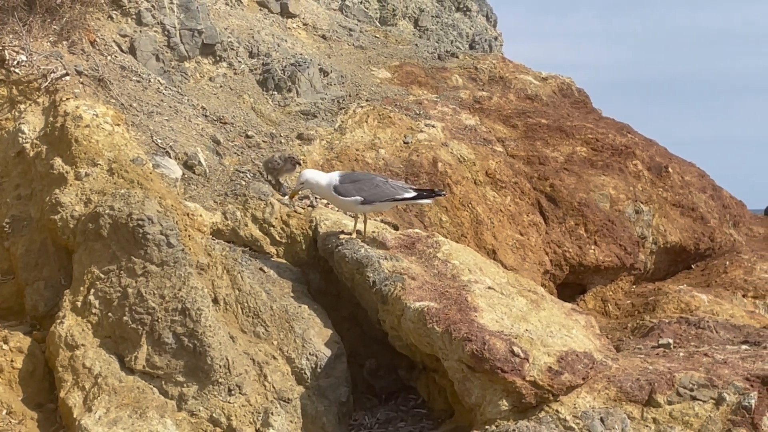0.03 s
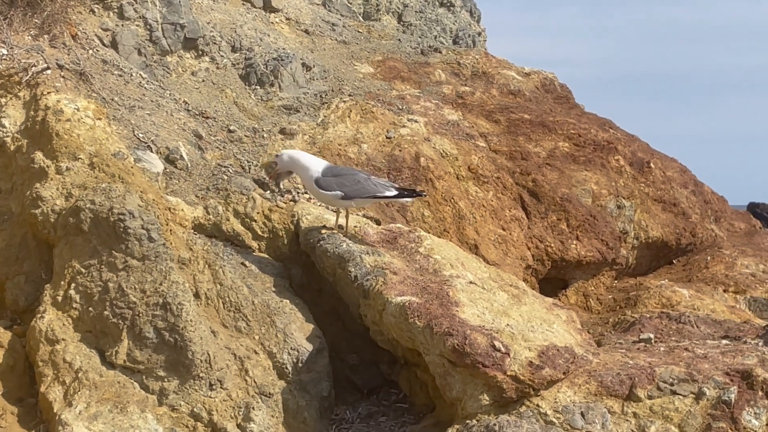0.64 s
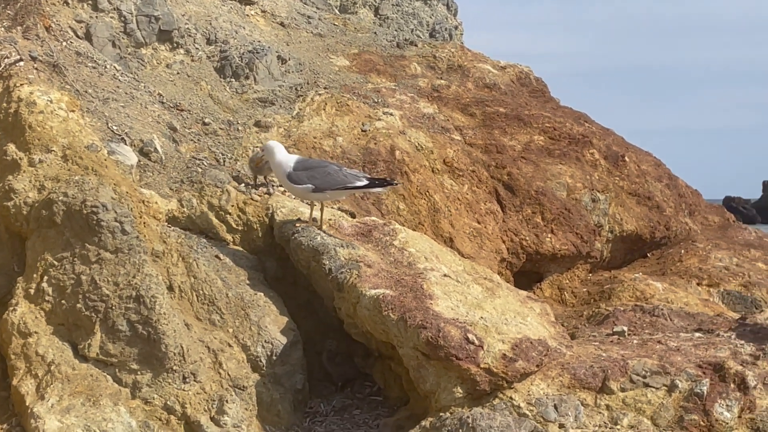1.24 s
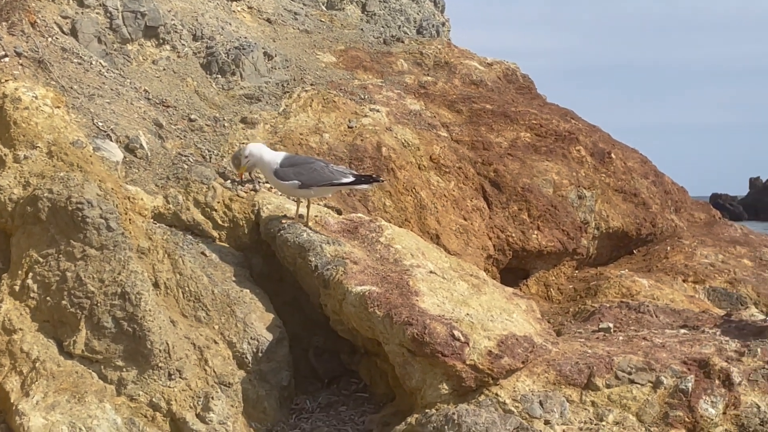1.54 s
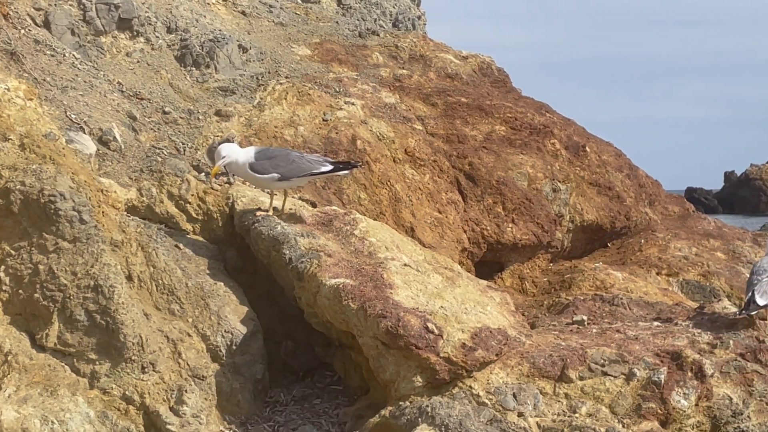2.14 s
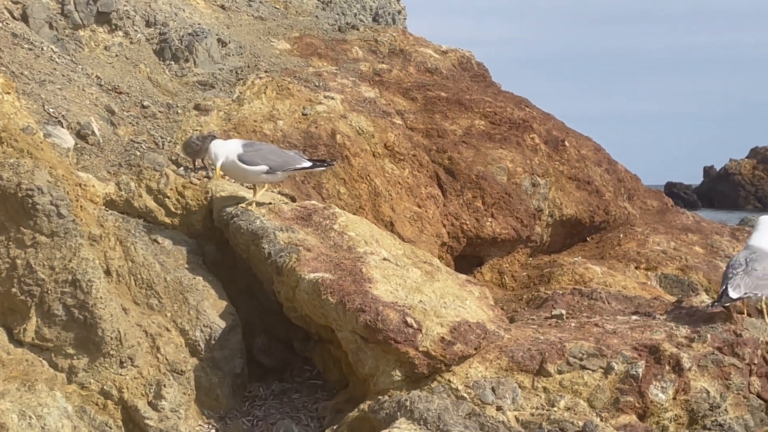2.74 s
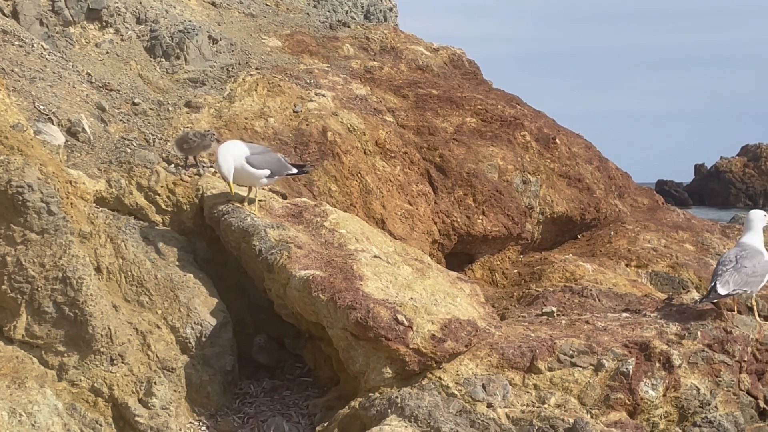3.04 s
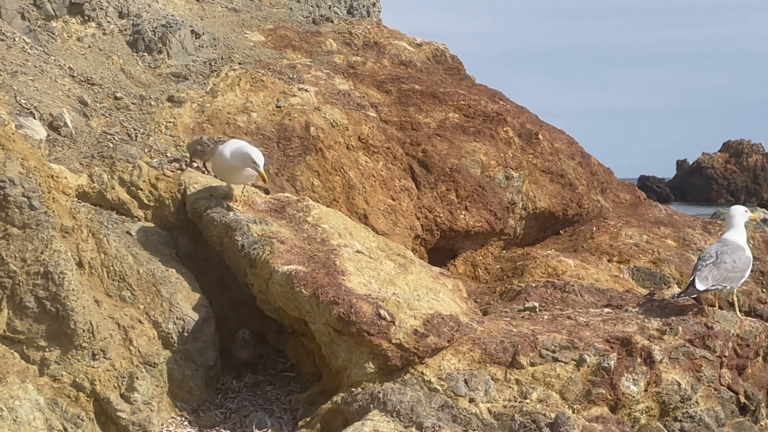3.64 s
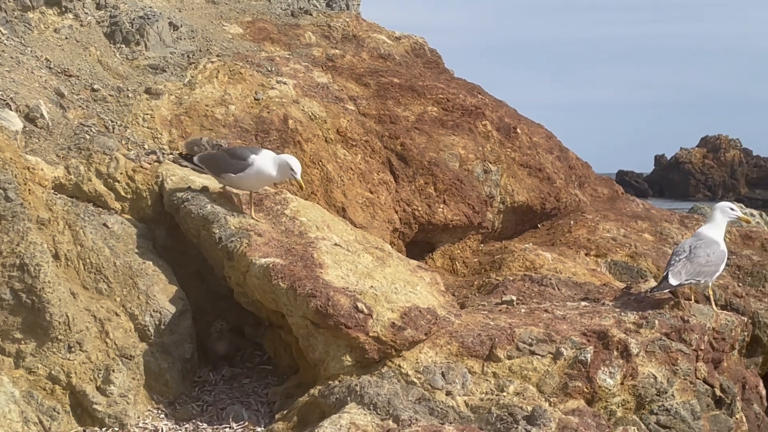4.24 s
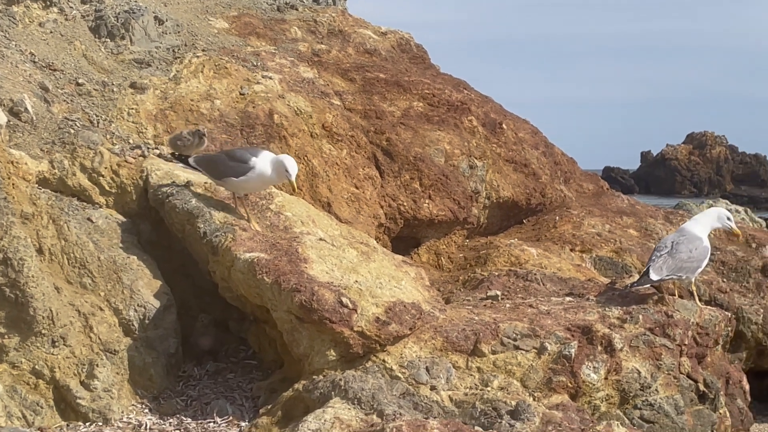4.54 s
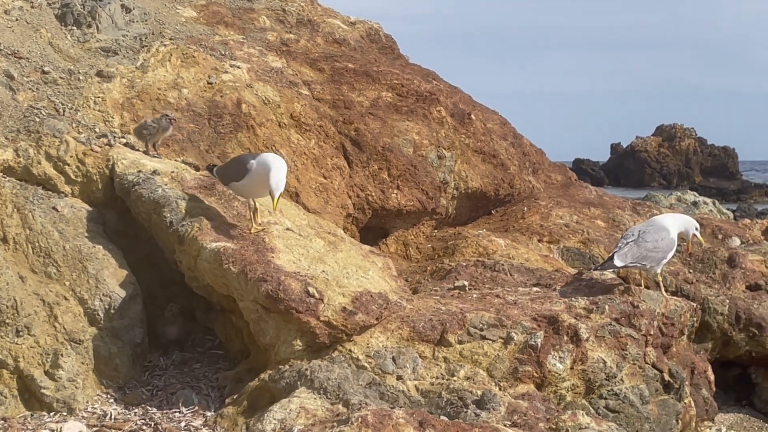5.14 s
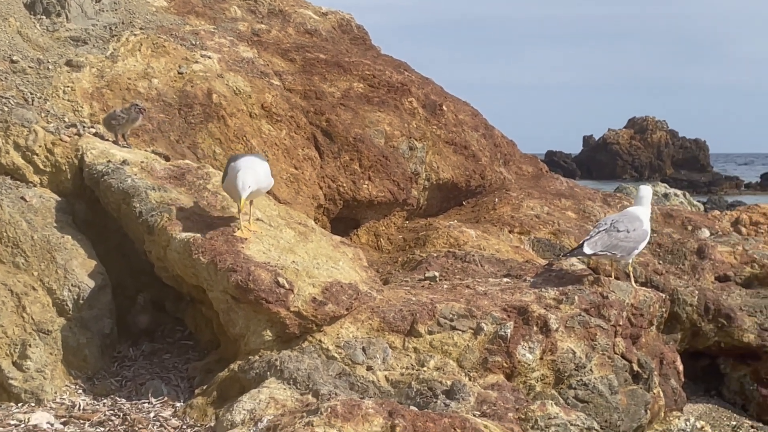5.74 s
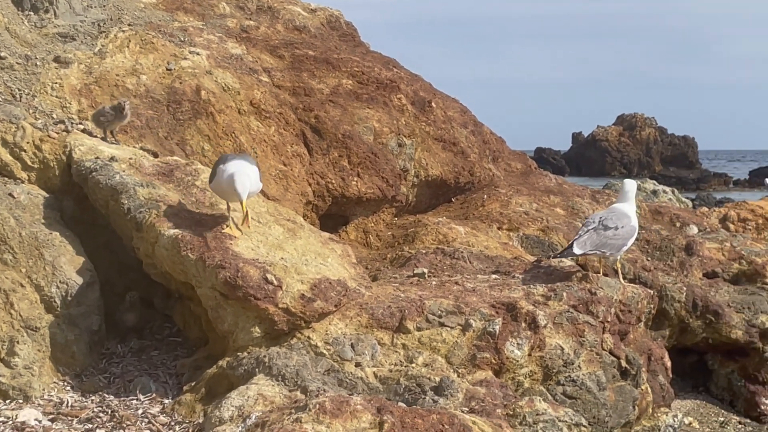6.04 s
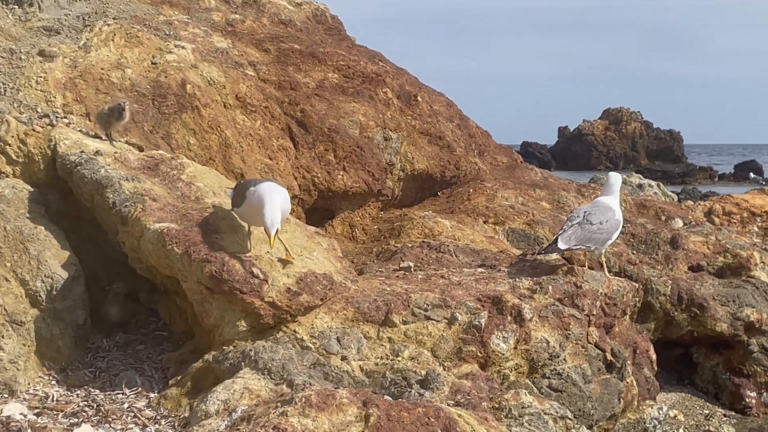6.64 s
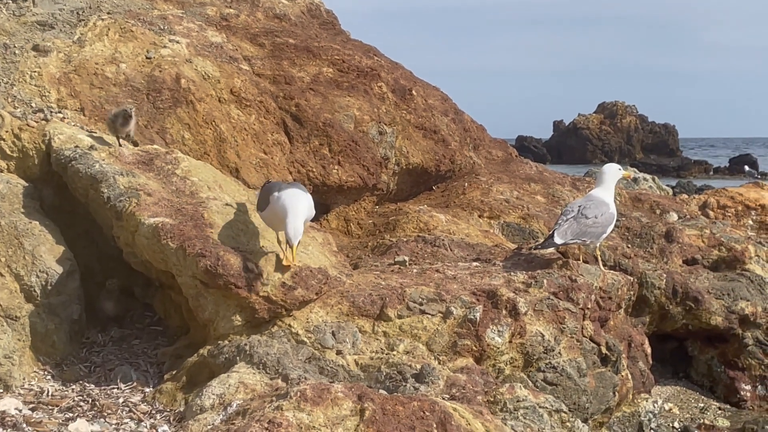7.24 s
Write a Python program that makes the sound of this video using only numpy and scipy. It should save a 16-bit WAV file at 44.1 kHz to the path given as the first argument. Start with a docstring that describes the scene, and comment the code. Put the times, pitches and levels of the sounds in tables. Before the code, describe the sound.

Distant sea washes low and steady behind a rocky shore. A chick begs in a faint, hoarse quaver at 0.3 seconds, returning around 1.8, 3.3, 4.9 and 6.6. A gull mews at 0.6, with a small dry knock. The wind rises and thumps on the microphone from 1 to 1.6 seconds, the loudest moment. Faint, thin chick peeps come in threes near 1, 3.4 and 5.6 seconds. A second mew sounds at 2.4 and a louder, yelping one at 3.1. Gusts rumble from about 4 seconds, with two small knocks on rock near 4.4 and more buffets around 5.5 and 6.2. A long, more distant wail runs from 4.6 to 5.6, overlapped by another gull's mew at 5.1. A nasal wail lasts from 6.5 to 7.4, followed by one peep. The cliff gives every call a slight, short echo.

```python
"""A rocky shore, the sea washing behind. A chick starts begging in hoarse quavers, then a gull mews:
a harmonic tone shaped by its throat and moving beak. The chick adds thin peeps as the wind picks up
and sheds eddies that thump on the microphone. Two more mews follow, then gusts and small knocks on
the rock. A long wail is overlapped by a second gull's mew, and a nasal wail and one peep close the
scene. The chick keeps returning throughout, and the cliff briefly answers every call."""
import sys
import numpy as np
from scipy import signal
from scipy.fft import rfft, irfft, next_fast_len
from scipy.io import wavfile
from scipy.ndimage import uniform_filter1d, map_coordinates

SR = 44100
rng = np.random.default_rng(int(sys.argv[2]) if len(sys.argv) > 2 else 0)


def waveform_to_disk(signal):
    """Save audio, clipped to [-1, 1], as 16-bit WAV at the path in sys.argv[1]."""
    frames = np.transpose(np.atleast_2d(signal))
    scaled = np.clip(frames, -1, 1) * 32767
    samples = np.round(scaled).astype(np.int16)
    wavfile.write(sys.argv[1], SR, samples)


N = 330309
T = np.arange(N) / SR
TOP_HZ = 14200

# tone colour of the noise beds: f/Hz, relative level/dB
SEA_SPECTRUM = [(25, -23), (70, 1.5), (170, -16), (1000, -18.5), (1600, -29), (6500, -51), (10000, -58.5)]
RUMBLE_SPECTRUM = [(22, -17), (65, 1), (130, -6), (300, -20), (600, -24.5), (1200, -37.5), (6000, -79)]
# stereo width of the beds: f/Hz, left-right correlation
BED_CORRELATION = [(60, .985), (250, .7), (1000, .45), (5000, .85), (11000, .3)]
# the breeze, freshening over the first second: t/s, level/dB
BREEZE = [(0, -78), (.8, -53.5), (1.7, -52.5)]
# gusts on top of it: crest t/s, level/dB, decay t/s
GUSTS = [(3.29, -48.5, 0.78), (4.15, -39, 0.24), (4.47, -41, 0.75), (5.482, -36, 0.2), (6.19, -38, 0.1)]
# large eddies striking the microphone: t/s, level/dB, starting f/Hz
EDDIES = [(1.03, -32.5, 664), (1.086, -19, 375), (1.246, -32.5, 333), (1.301, -22, 413),
          (1.309, -19.5, 266), (1.431, -11.5, 454), (1.435, -16.5, 160), (1.451, -18.5, 464),
          (1.548, -17.5, 548), (1.769, -34.5, 504), (2.17, -41, 635), (2.61, -42, 330), (2.991, -36.5, 587),
          (3.285, -39, 330), (4.033, -33.5, 500), (4.146, -28.5, 644), (4.159, -26.5, 337),
          (4.186, -38, 616), (4.243, -35, 604), (4.324, -35.5, 720), (4.437, -37.5, 420), (4.486, -39, 600),
          (4.581, -34.5, 655), (4.685, -39.5, 380), (5.437, -28.5, 570), (5.83, -35, 300),
          (6.113, -35.5, 490), (6.171, -21, 112.4), (6.314, -34, 583), (6.411, -34, 624),
          (7.46, -34.5, 390)]
# decay of the cliff's answer: f/Hz, t60/s
CLIFF_DECAY = [(300, 0.1), (1000, 0.5), (6000, 0.2)]
# small knocks on the rock: t/s, level/dB, ring f/Hz
KNOCKS = [(.669, -32.5, 1904), (4.392, -39, 850), (4.467, -36.5, 980)]

# the chick's peeps: t/s, pitch f/Hz, level/dB, glide as a share of the pitch
PEEPS = [(1.003, 676, -56, 0.11), (1.075, 681, -60, -0.069), (1.157, 633, -65.5, -0.077),
         (3.348, 696, -55.5, 0.059), (3.427, 680, -52.5, -0.17), (3.521, 675, -56, -0.067),
         (5.579, 661, -56.5, -0.13), (5.653, 685, -51.5, -0.17), (5.729, 637, -62.5, -0.085),
         (7.45, 710, -51.5, -0.04)]
# its hoarse quavers: start t/s, end t/s, pitch f/Hz, level/dB
BEGS = [(0.339, 0.577, 889, -55), (1.81, 2.104, 907, -57.5), (3.307, 3.593, 916, -59),
        (4.9, 5.188, 890, -53), (6.592, 6.835, 921, -54.5)]
# its throat for each: f/Hz, relative level/dB
PEEP_THROAT = [(1400, -15), (2100, -4), (2800, -1), (3050, -2.5), (3400, 2.5), (3800, -9), (4750, -6.5),
               (5500, -31), (7200, -21), (14000, -63.5)]
BEG_THROAT = [(500, -41), (920, 6), (1350, -33), (1850, -1), (2600, 6.5), (3500, -8.5), (4500, -7),
              (5600, -26), (7500, -41), (10500, -26), (14000, -48)]

# held part of each gull call, with harmonics 1-4 as its body and the higher ones as its edge:
# t/s, pitch f/Hz, body level/dB, edge level/dB, beak resonance f/Hz
MEW_1 = [(.59, 423.5, -38, -53, 1187), (.615, 441, -42, -51, 1110), (.67, 432, -41.5, -59.5, 1120),
         (.75, 405.6, -46, -62, 943), (.825, 425.5, -35.5, -68.5, 972), (.858, 386, -47, -73.5, 900)]
MEW_2 = [(2.385, 365.3, -49.5, -50, 916), (2.455, 431.5, -46.5, -52.5, 1124), (2.53, 432.5, -48, -46, 1154),
         (2.585, 421.3, -53.5, -62.5, 975), (2.648, 403.4, -40, -69.5, 777),
         (2.672, 395, -49.5, -75.5, 790)]
MEW_3 = [(3.058, 394.5, -44.5, -54, 1300), (3.078, 407, -34, -40, 1380), (3.117, 414.2, -37.5, -48, 1440),
         (3.124, 434, -39, -44.5, 990), (3.142, 451.3, -34.5, -59, 860), (3.218, 443.6, -31, -58.5, 850),
         (3.243, 434.6, -34.5, -67, 910)]
MEW_4 = [(5.083, 426.4, -38, -48.5, 1310), (5.1, 424.3, -32.5, -43, 1240),
         (5.122, 449.5, -42.5, -59.5, 1020), (5.18, 427.3, -40, -64.5, 970),
         (5.23, 404.2, -45.5, -65.5, 940), (5.38, 388.5, -42.5, -62.5, 1016),
         (5.475, 386.6, -45, -61.5, 895)]
WAIL_1 = [(4.648, 349.2, -49.5, -64, 1330), (4.74, 360.6, -60.5, -64.5, 1190),
          (4.84, 370.7, -49.5, -59.5, 1440), (5.04, 396.4, -50.5, -62.5, 1550),
          (5.17, 419.6, -46.5, -54, 1810), (5.32, 406.4, -42.5, -58, 1380), (5.46, 383, -53, -78, 1520),
          (5.485, 443, -45, -60, 1190), (5.585, 418.3, -47, -66.5, 1000)]
WAIL_2 = [(6.545, 412, -44.5, -57.5, 1640), (6.62, 369.7, -53.5, -51, 2100), (6.77, 367.2, -53, -54, 2320),
          (6.96, 389.5, -49, -48, 2480), (7.2, 399.3, -47.5, -43.5, 2230), (7.28, 395, -46, -43.5, 2270),
          (7.365, 383.2, -44, -52.5, 1480), (7.41, 342, -48, -62, 1350)]
# the gulls' throat colours: f/Hz, relative level/dB
OPEN_THROAT = [(420, -6), (850, -7), (1280, -12), (1720, -25), (2150, 6), (2600, -16), (3150, 2),
               (3600, -11.5), (4050, -11.5), (6700, -26), (14000, -53)]
NARROW_THROAT = [(420, 2), (1300, -3), (2150, 0.5), (2600, 10.5), (3000, -12.5), (3450, -14), (4000, -29),
                 (14000, -66)]
YELP_THROAT = [(420, -4.5), (1650, -17), (2080, 0), (2500, -13.5), (3250, 3.5), (3700, -9), (4200, -5),
               (14000, -46)]
GAPING_THROAT = [(420, 4.5), (850, -6), (2100, -4.5), (2500, -18), (3400, -7), (4300, -8.5), (5000, -25),
                 (7000, -21), (14000, -53.5)]  # beak wide open
FAR_THROAT = [(380, -2), (1500, -4), (1850, -18.5), (2200, -10.5), (2600, -28.5), (3000, -18),
              (4000, -35.5), (5000, -64)]
NASAL_THROAT = [(390, -4.5), (780, -28), (1180, -19.5), (1580, -14.5), (1970, -9), (2350, 0), (2750, -11),
                (3150, -9.5), (3550, -22), (3950, -0.5), (4330, -11.5), (4730, -7.5), (5100, -30),
                (5500, -14.5), (7000, -22), (14000, -31.5)]
CROAK_THROAT = [(550, -27), (930, 7), (1500, -39.5), (5000, -69.5)]  # either side of the tone
SHRILL_COLOUR = [(4700, -40), (5200, -3.5), (7100, -5), (8800, -25), (11300, -17.5), (14000, -31)]  # opens late in a mew

# the microphone pair toward the birds: f/Hz, left minus right level/dB, left lead/rad
MIC_PORTS = [(200, 0, 0), (400, -2.5, -.2), (800, 7.5, -.7), (1250, 3, -1), (1700, 1, -.6), (2250, 2, 1.3),
             (3200, 1, .35), (7500, 0, .2), (9500, 0, 1.6)]
# the microphone's notch: f/Hz, level/dB
MIC_NOTCH = [(7300, 2.5), (7900, -11.5), (8400, -32), (9100, -1.5)]


def amp(db):
    """Decibels to gain."""
    return 10 ** (np.asarray(db) / 20)


def unit(x):
    """Scale to rms 1."""
    return x / np.sqrt(np.mean(x ** 2) + 1e-20)


def along(table, hz, column=1):
    """One column of a frequency table, read on a log axis."""
    cols = np.transpose(table)
    return np.interp(np.log(hz + 1), np.log(cols[0] + 1), cols[column])


def curves(rows, t):
    """Each column after the time, read at the times t."""
    s, *cols = np.transpose(rows)
    return [np.interp(t, s, c) for c in cols]


def wobble(rate, size):
    """A smooth random curve, rate knots a second."""
    knots = rng.standard_normal(int(size * rate / SR) + 4)
    return map_coordinates(knots, [np.arange(size) * rate / SR])


def filtered(x, response):
    """Pass x through a frequency response."""
    n = x.shape[-1]
    m = next_fast_len(n + SR // 8)
    return irfft(rfft(x, m) * response(np.fft.rfftfreq(m, 1 / SR)), m)[..., :n]


def add(track, s, sound):
    """Mix a sound into a track at time s."""
    part = track[max(round(s * SR), 0):][:len(sound)]
    part += sound[:len(part)]


def gate(t, start, end, fade):
    """Soft on and off."""
    return np.sin(np.pi / 2 * np.clip(np.minimum(t - start, end - t) / fade, 0, 1)) ** 2


def noise_bed(spectrum, patchy_db):
    """Stereo noise of rms 1 with patches of random gain."""
    bins = signal.stft(rng.standard_normal((2, N)), nperseg=512)[2]
    patches = uniform_filter1d(rng.standard_normal(bins.shape[1:]), size=6, axis=0)
    patches = uniform_filter1d(patches, size=14, axis=1)
    pair = signal.istft(bins * amp(patchy_db * unit(patches)), nperseg=512)[1][:, :N]
    width = lambda hz: np.arccos(along(BED_CORRELATION, hz)) / 2
    colour = lambda hz: amp(along(spectrum, hz)) * [np.cos(width(hz)), np.sin(width(hz))]
    mid, side = filtered(pair, colour)
    return unit(np.array([mid + side, mid - side]))


def sea(level_db=-56.5):
    """The steady wash of distant water."""
    return amp(level_db) * noise_bed(SEA_SPECTRUM, patchy_db=1)


def buffeting(rise_s=0.087, churn_db=6, churn_s=.022):
    """Wind strength in dB: breeze plus fast-building gusts, churning harder around each large eddy."""
    breeze_db, = curves(BREEZE, T)
    power = amp(breeze_db) ** 2
    for crest, db, decay_s in GUSTS:
        envelope = np.exp(-np.maximum((crest - T) / rise_s, (T - crest) / decay_s))
        power += (amp(db) * envelope) ** 2
    nearest_s = np.full(N, np.inf)
    for s, _, _ in EDDIES:
        nearest_s = np.minimum(nearest_s, np.abs(T - s - churn_s / 2))
    return 10 * np.log10(power) + churn_db / (1 + (nearest_s / churn_s) ** 4)


def eddy(start_hz, rise_cycles=1.9, crackle=0.11, wake=0.14, wake_s=0.013):
    """A vortex crossing the port: a quick, ragged flutter that slows to a thump and leaves a low wake."""
    t = np.arange(SR // 10) / SR
    age = t * start_hz / rise_cycles  # slow eddies last longer
    swell = lambda v: v ** 2 * np.exp(2 - 2 * v)
    end_hz = np.sqrt(17 * start_hz)
    hz = end_hz + (start_hz - end_hz) * np.exp(-age / 1.08)
    ragged = 1 + crackle * np.exp(-age) * wobble(1700, len(t))
    envelope = swell(age) * ragged + wake * swell(t / wake_s)
    return envelope * np.sin(2 * np.pi * (np.cumsum(hz) / SR + rng.random()))


def wind(rumble_db=-2.5, splinter_db=-3, splinter_s=.04, flutter_db=2, crossing_s=.00028, low_cut_hz=40):
    """Lumpy rumble, big eddies that splinter in a strong gust, and small ones that ride the gusts."""
    buffet_db = buffeting()
    thumps = np.zeros(N)
    for s, db, hz in EDDIES:
        add(thumps, s, amp(db) * eddy(hz))
        for when, speed in rng.random((4, 2)):
            splinter = amp(buffet_db[int(s * SR)] + splinter_db - 10 * speed) * eddy(400 + 800 * speed)
            add(thumps, s + splinter_s * (when - .5), splinter)
    for when, size, speed in rng.random((170, 3)):  # the small eddies
        db = buffet_db[int(when * N)] + flutter_db - 12 * (1 - size)
        add(thumps, when * T[-1], amp(db) * eddy(320 + 600 * speed))
    lead_s = np.array([[.5], [-.5]]) * crossing_s  # eddies reach the left port first
    low_cut = lambda hz: hz ** 4 / (hz ** 4 + low_cut_hz ** 4)
    thumps = filtered(thumps, lambda hz: np.exp(2j * np.pi * hz * lead_s) * low_cut(hz))
    lumps_db = 3.7 * wobble(22, N)
    return thumps + amp(buffet_db + rumble_db + lumps_db) * noise_bed(RUMBLE_SPECTRUM, patchy_db=3.5)


def cliff(sound, predelay_s=0.007):
    """The rocks scatter a short, diffuse answer."""
    hz, t, bins = signal.stft(rng.standard_normal((2, SR // 2)), SR, nperseg=256)
    decay = amp(-60 * t / along(CLIFF_DECAY, hz)[:, None])
    tail = signal.istft(bins * decay, SR, nperseg=256)[1]
    delayed = np.pad(sound, (int(predelay_s * SR), 0))
    return signal.fftconvolve(delayed[None], tail / np.linalg.norm(tail[0]), axes=1)[:, :N]


def knocks(crack_t60=0.013, ring_t60=0.034):
    """Dry cracks on the rock, each with a short ring; the lower the ring, the duller the crack."""
    out, t = np.zeros(N), np.arange(SR // 20) / SR
    for s, db, hz in KNOCKS:
        burst = rng.standard_normal(len(t)) * amp(-60 * t / crack_t60)
        crack = signal.sosfilt(signal.butter(4, 2.2 * hz, fs=SR, output="sos"), burst)
        ring = np.sin(2 * np.pi * hz * t) * amp(-60 * t / ring_t60)
        add(out, s, amp(db) * (crack + ring / 2))
    return out


def harmonics(pitch, throat, count):
    """Rows of partials on a pitch curve: frequency, gain through the throat, wave of rms 1."""
    k = np.arange(1, count + 1)[:, None]
    hz = k * pitch
    phase = 2 * np.pi * (k * np.cumsum(pitch) / SR + rng.random((count, 1)))
    return hz, amp(along(throat, hz)) * (hz < TOP_HZ), np.sqrt(2) * np.sin(phase)


def stack(gain, wave):
    """Sum partials at a steady rms of 1."""
    return np.sum(gain * wave, 0) / np.sqrt(np.sum(gain ** 2, 0) + 1e-20)


def rasp(throat, size):
    """Turbulence shaped by a throat, rms 1."""
    colour = lambda hz: amp(along(throat, hz)) * (hz > throat[0][0])
    return unit(filtered(rng.standard_normal(size), colour))


def peeps(length_s=.065, attack_s=.018, decay_s=.042, hoarse_db=-12, whistle_db=-60, whistle_s=.045):
    """The chick's thin notes start husky, slide and fade treble first; a whistle slurs close ones."""
    out = np.zeros(N)
    t, whistle_t = np.arange(0, length_s, 1 / SR), np.arange(0, whistle_s, 1 / SR)
    from_middle = t / length_s - .5
    husk = np.exp(-t / attack_s)
    envelope = gate(t, 0, length_s, attack_s) / (1 + (t / decay_s) ** 6)
    previous_s = -np.inf
    for s, pitch, db, glide in PEEPS:
        contour = 1 + glide * from_middle - .1 * from_middle ** 2 + .04 * husk * wobble(610, len(t))
        hz, gain, wave = harmonics(pitch * contour, PEEP_THROAT, count=19)
        flicker_db = 4.8 * np.array([wobble(50, len(t)) for _ in gain])
        dulling_db = 9 * from_middle * np.log2(hz / pitch)
        tone = stack(gain * amp(flicker_db - dulling_db), wave)
        breath = amp(hoarse_db) * (1 + 2 * husk) * rasp(PEEP_THROAT, len(t))
        add(out, s, amp(db) * (tone + breath) * envelope)
        if s - previous_s < .12:
            whistle_hz = 1750 + 650 * whistle_t / whistle_s + 70 * wobble(690, len(whistle_t))
            whistle = amp(whistle_db) * np.sin(2 * np.pi * np.cumsum(whistle_hz) / SR)
            add(out, s - .026, whistle * gate(whistle_t, 0, whistle_s, whistle_s / 2))
        previous_s = s
    return out


def begging(quaver_hz=14.2, depth=.05, sag=.07, jitter=.02, hoarse_db=-8, scratch_db=2):
    """The chick's sagging quaver: past each crest it scratches and the syrinx's other side joins in."""
    out = np.zeros(N)
    for start, end, pitch, db in BEGS:
        t = np.arange(0, end - start, 1 / SR)
        quaver = lambda crest_s: np.cos(2 * np.pi * quaver_hz * (t - crest_s))
        contour = 1 + depth * quaver(crest_s=.03) - sag * (t / t[-1] - .5)
        strain = (1 + quaver(crest_s=.038)) / 2
        tone = 0
        for ratio, level in [(1, 1 - strain / 3), (.78, amp(-1) * strain)]:  # the syrinx's two sides
            shake = jitter * ((.5 + 2 * strain) * wobble(700, len(t)) + wobble(60, len(t)))
            _, gain, wave = harmonics(ratio * pitch * (contour + shake), BEG_THROAT, count=14)
            tone = tone + level * stack(gain, wave)
        breath = amp(hoarse_db) * (.5 + strain) * rasp(BEG_THROAT, len(t))
        scratch = unit(amp(scratch_db * (1 + strain) / 2 * wobble(130, len(t))))
        add(out, start, amp(db) * (tone + breath) * scratch * gate(t, 0, t[-1], 0.023))
    return out


def phrase(held):
    """A gull's whole call: a weaker scoop up, the held part, and a weaker drop away."""
    def tip(row, shift_s, pitch_ratio, body_db, edge_db, beak_ratio):
        s, pitch, body, edge, beak_hz = row
        return s + shift_s, pitch * pitch_ratio, body + body_db, edge + edge_db, beak_hz * beak_ratio
    scoop = tip(held[0], shift_s=-.028, pitch_ratio=.84, body_db=-12.5, edge_db=-14, beak_ratio=.93)
    drop = tip(held[-1], shift_s=.03822, pitch_ratio=.78, body_db=-22.5, edge_db=-7.5, beak_ratio=.97)
    return [scoop, *held, drop]


def gull(held, throat, beak_db, dulling_db, hoarse_db=-19, beak_width_hz=190, croak_db=-14,
         gape_db=0, sink_octaves=0, shrill_db=None):
    """One call: a croak, a tone under the moving beak resonance that breaks up in fast glides, a croak."""
    rows = phrase(held)
    t = np.arange(rows[0][0] - .008, rows[-1][0] + 0.018, 1 / SR)
    progress = (t - t[0]) / (t[-1] - t[0])
    pitch, body_db, edge_db, beak_hz = curves(rows, t)
    octaves_per_s = np.abs(np.gradient(np.log2(pitch))) * SR
    breakup = uniform_filter1d(np.minimum(octaves_per_s / 8, 2), size=SR // 50)
    pitch = pitch * (1 + (.0025 + .03 * breakup) * wobble(260, len(t)))
    hz, gain, wave = harmonics(pitch, throat, count=36)
    low, high = slice(4), slice(4, None)
    beak = amp(beak_db / (1 + ((hz - beak_hz) / beak_width_hz) ** 2))
    # as the neck stretches its resonances sink, and the upper partials swell and drop out one by one
    neck_db = along(throat, hz[high] * 2 ** (sink_octaves * progress ** 2))
    swing = lambda db, rate: amp(db * np.array([wobble(rate, len(t)) for _ in hz[high]]))
    upper = wave[high] * swing(db=2, rate=50)
    drift = swing(db=4.8, rate=10)
    # the treble tilts down as the beak closes, up as it opens
    db_per_octave = gape_db * ((2 * progress - 1) ** 4 - 0.9) - dulling_db * progress ** 2
    tilt_db = db_per_octave * np.log2(hz[high] / hz[high][0])
    roughness = 1 + .5 * breakup * wobble(300, len(t))
    body = amp(body_db) * stack((gain * beak)[low], wave[low]) * roughness
    edge = amp(edge_db) * stack(beak[high] * drift * amp(neck_db + tilt_db), upper)
    if shrill_db is not None:
        shrill = stack(drift * amp(along(SHRILL_COLOUR, hz[high])), upper)
        edge += amp(shrill_db) * shrill * gate(progress, start=.36, end=.97, fade=.2)
    # air escapes once in each cycle
    breath = amp(edge_db + hoarse_db + 9.9 * breakup) * rasp(throat, len(t)) * (1 + .5 * wave[0])
    ends = gate(t, t[0], held[0][0], 0.018) + gate(t, held[-1][0], t[-1], 0.015)
    croak = amp(body_db.max() + croak_db) * ends * rasp(CROAK_THROAT, len(t))
    out = np.zeros(N)
    add(out, t[0], (body + edge + breath + croak) * gate(t, t[0], t[-1], 0.0093))
    return out


def gulls():
    """Four short mews and two long wails, each through its own throat shape."""
    mews = gull(MEW_1, OPEN_THROAT, beak_db=27.5, dulling_db=12.5, sink_octaves=.72, shrill_db=-81.5)
    mews += gull(MEW_2, NARROW_THROAT, beak_db=26.5, dulling_db=15, sink_octaves=.062, shrill_db=-93)
    mews += gull(MEW_3, YELP_THROAT, beak_db=25, dulling_db=-8, beak_width_hz=324, hoarse_db=-15.5)
    mews += gull(MEW_4, GAPING_THROAT, beak_db=16, dulling_db=-2.5, hoarse_db=-13, croak_db=-21.5,
                 shrill_db=-67)
    wails = gull(WAIL_1, FAR_THROAT, beak_db=17.5, dulling_db=-12)
    wails += gull(WAIL_2, NASAL_THROAT, beak_db=7, dulling_db=4.5, hoarse_db=-29.5, gape_db=12.5)
    return mews + wails


def ports(hz):
    """The microphone pair places the direct sound by level and phase between left and right."""
    ratio = amp(along(MIC_PORTS, hz)) * np.exp(1j * along(MIC_PORTS, hz, column=2))
    return 2 * np.array([ratio, np.ones_like(ratio)]) / (1 + ratio)


def scene(cliff_db=-18):
    """Birds and knocks up front, the cliff behind them, sea and wind all around."""
    foreground = gulls() + begging() + peeps() + knocks()
    return filtered(foreground, ports) + amp(cliff_db) * cliff(foreground) + sea() + wind()


def record(dry):
    """The microphone notches the treble and cuts off the very top."""
    return filtered(dry, lambda hz: amp(along(MIC_NOTCH, hz)) * (hz < TOP_HZ))


dry = scene()
out = record(dry)
waveform_to_disk(out)
```